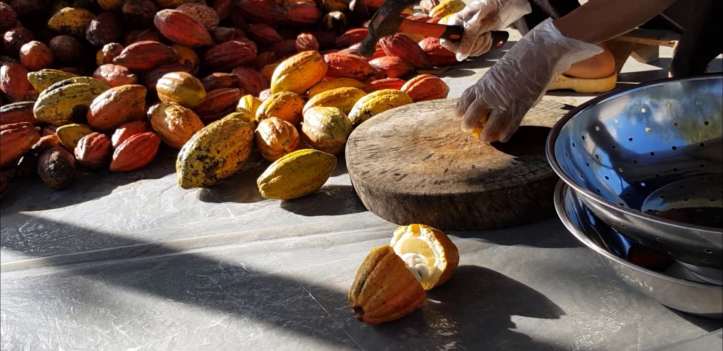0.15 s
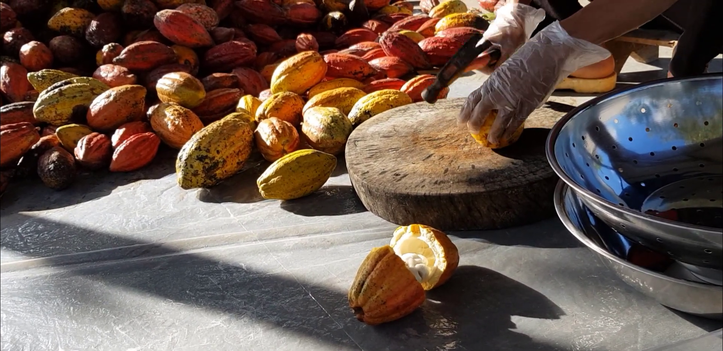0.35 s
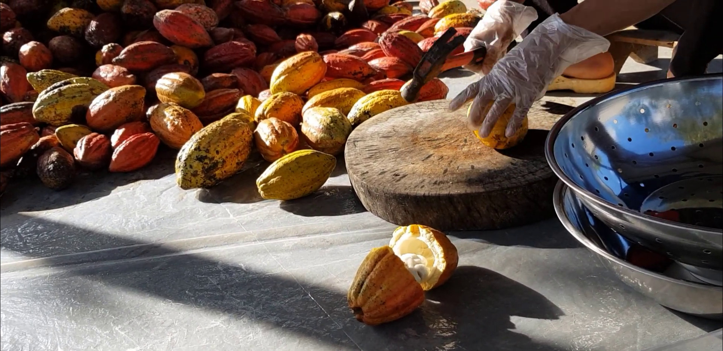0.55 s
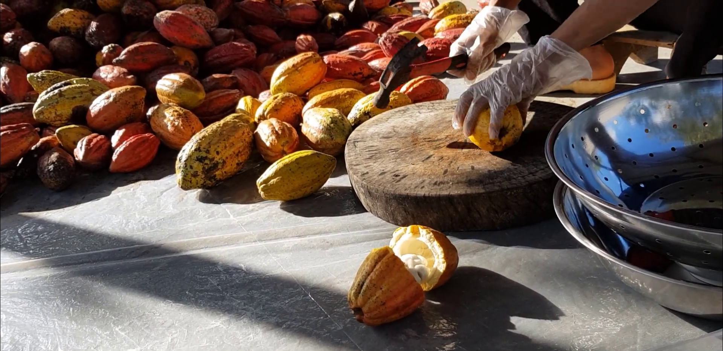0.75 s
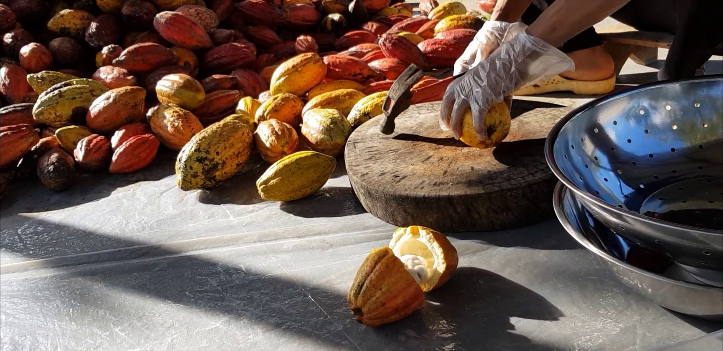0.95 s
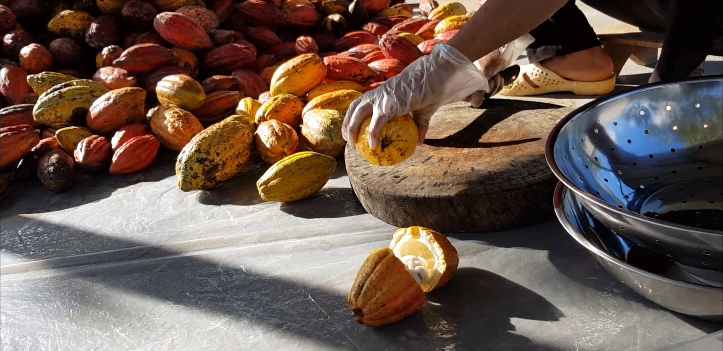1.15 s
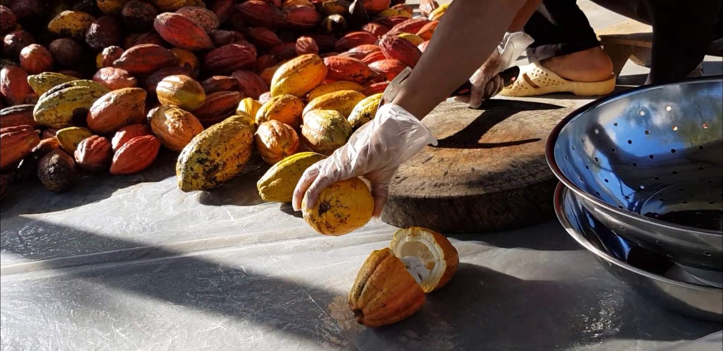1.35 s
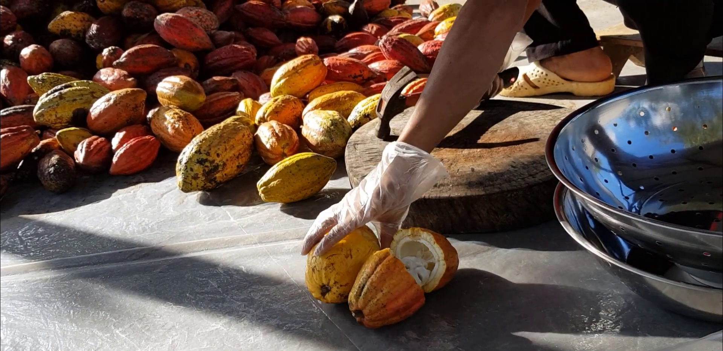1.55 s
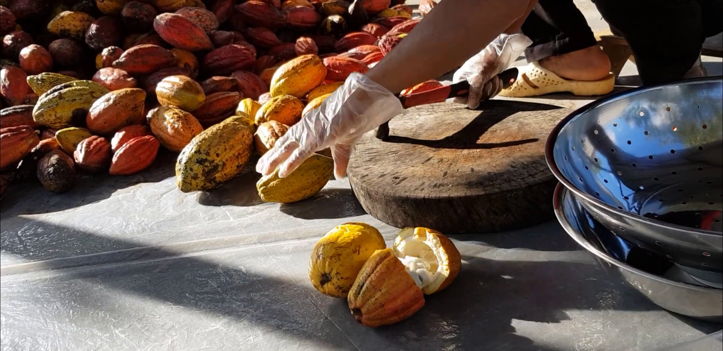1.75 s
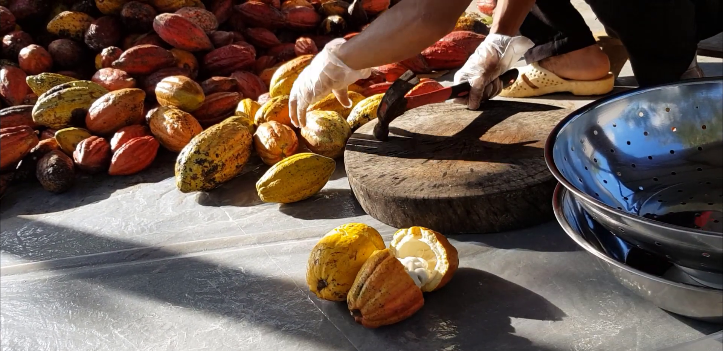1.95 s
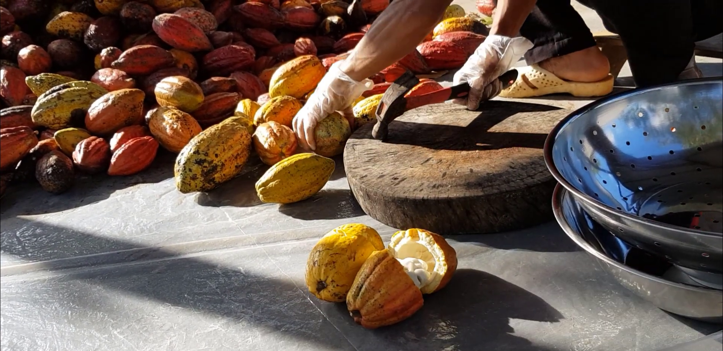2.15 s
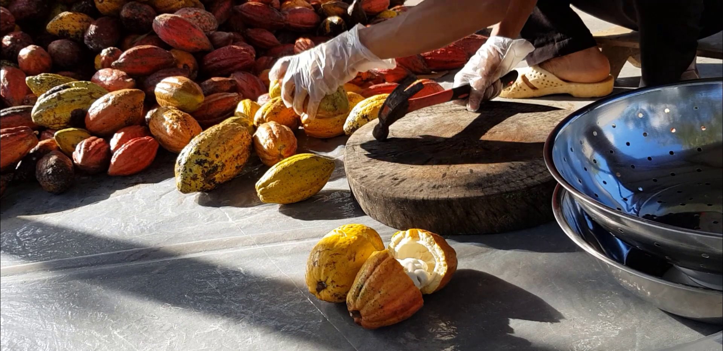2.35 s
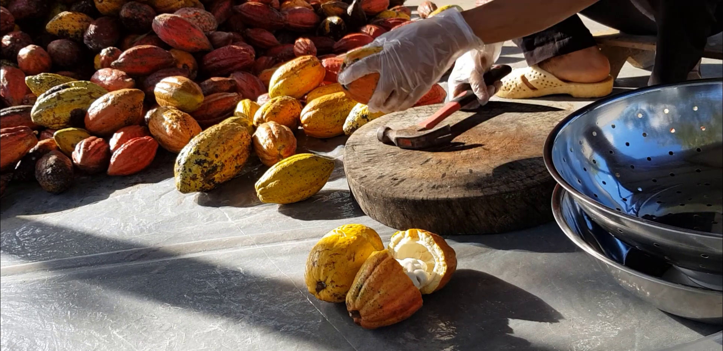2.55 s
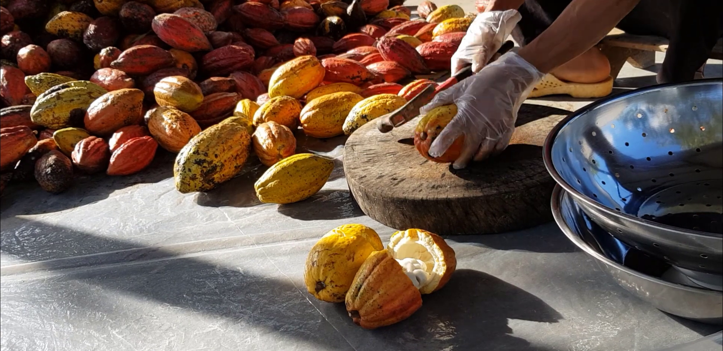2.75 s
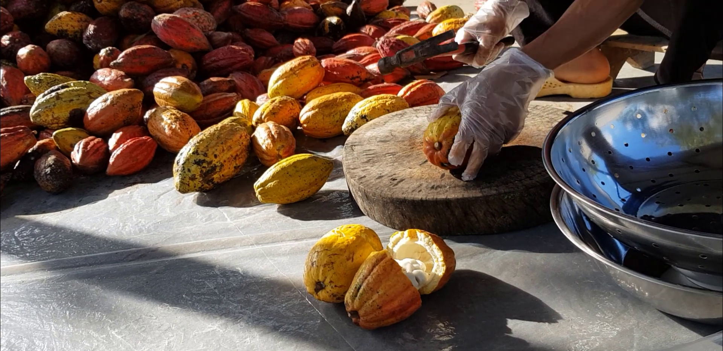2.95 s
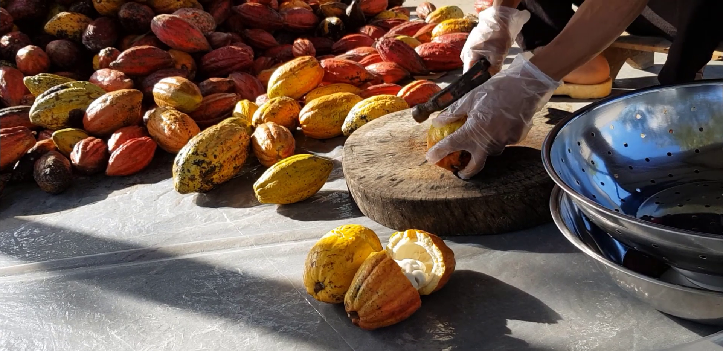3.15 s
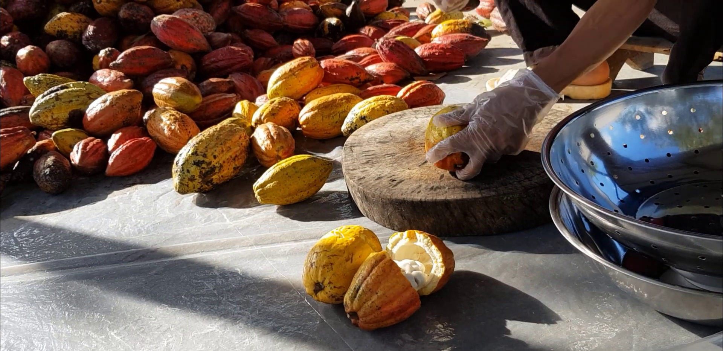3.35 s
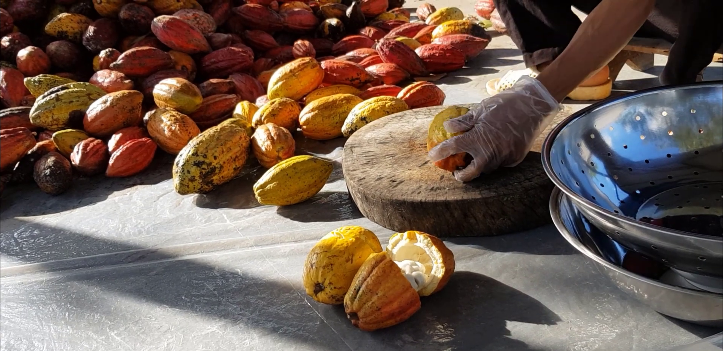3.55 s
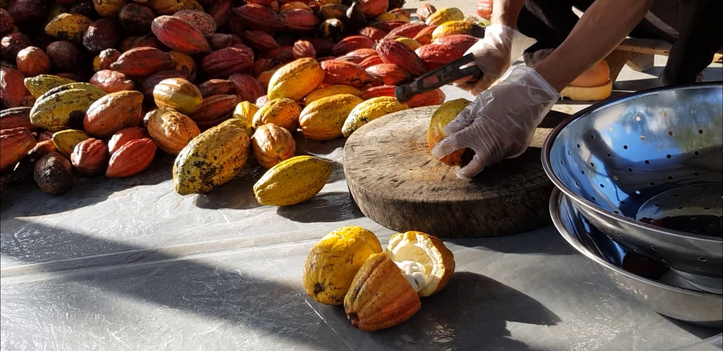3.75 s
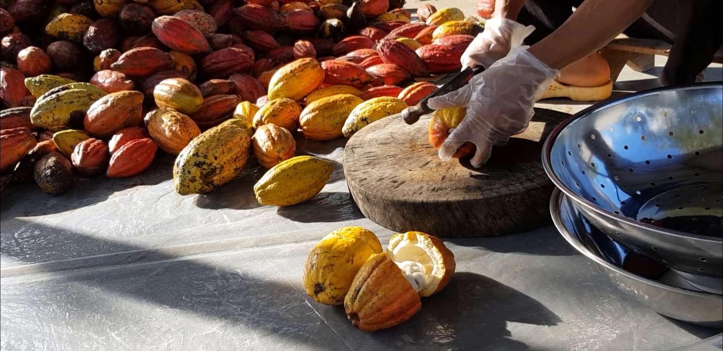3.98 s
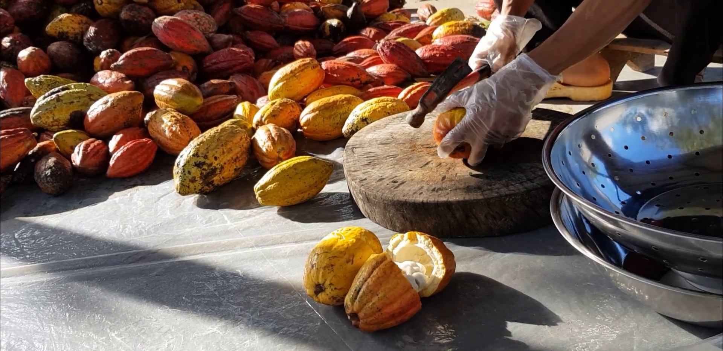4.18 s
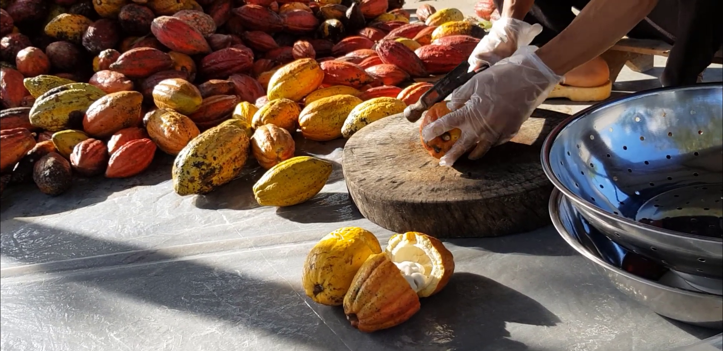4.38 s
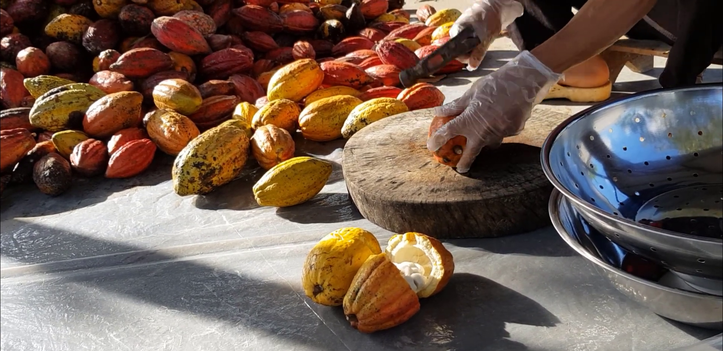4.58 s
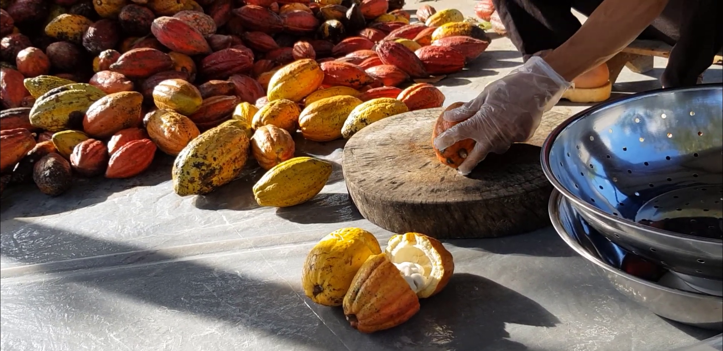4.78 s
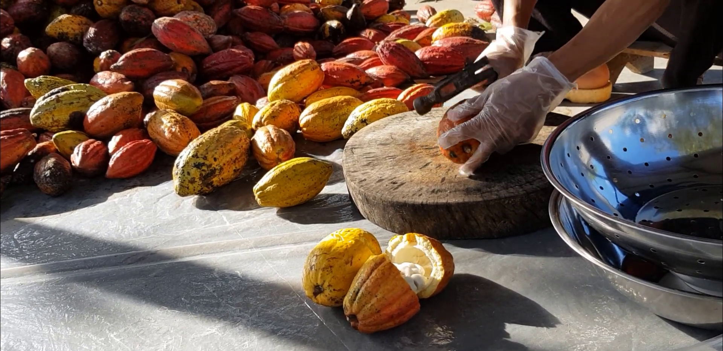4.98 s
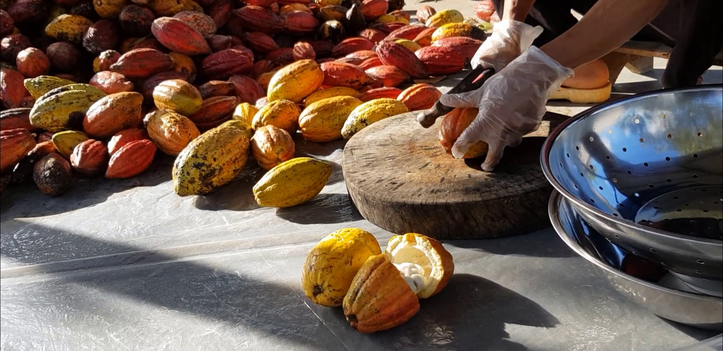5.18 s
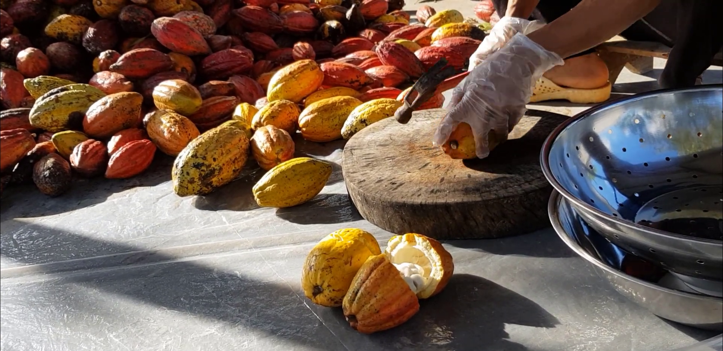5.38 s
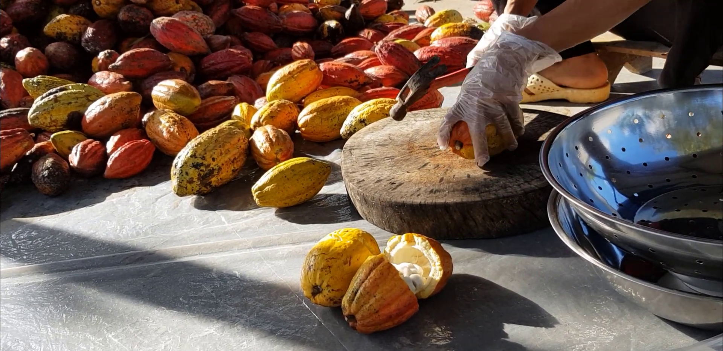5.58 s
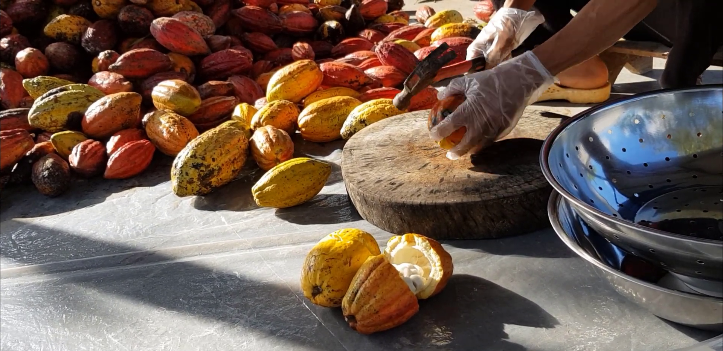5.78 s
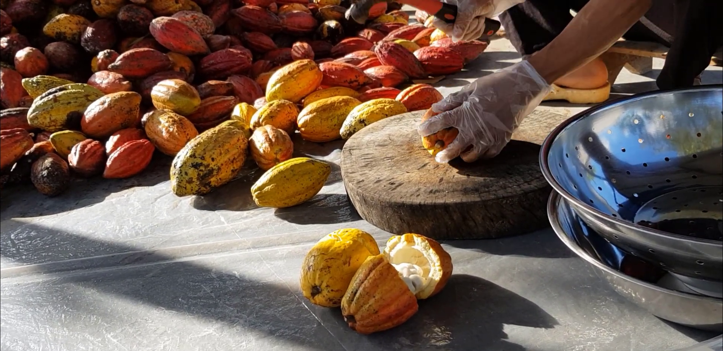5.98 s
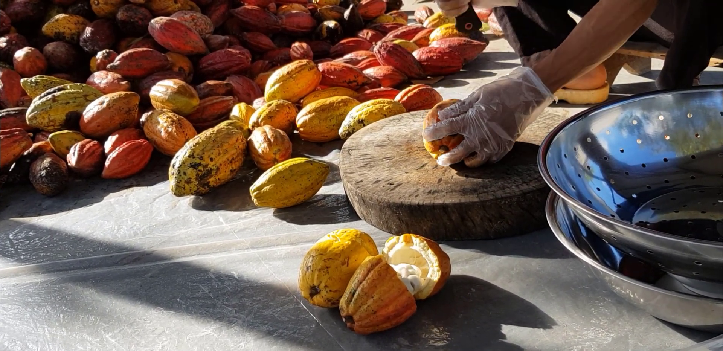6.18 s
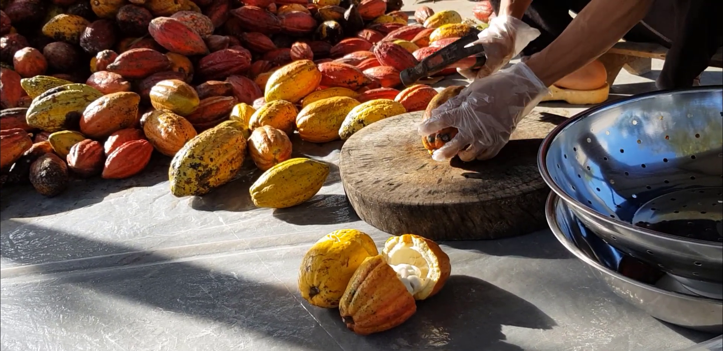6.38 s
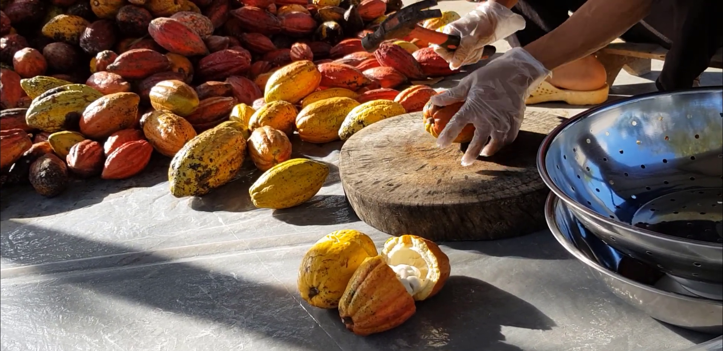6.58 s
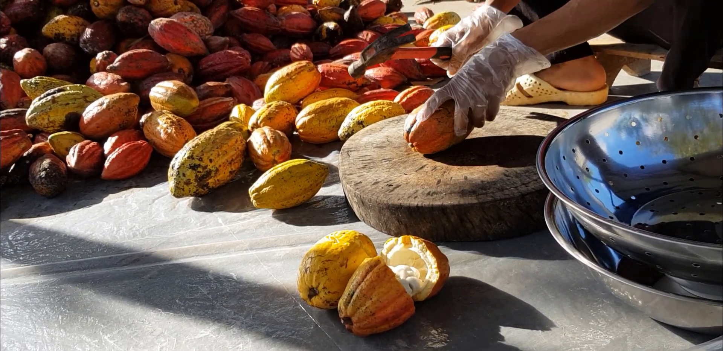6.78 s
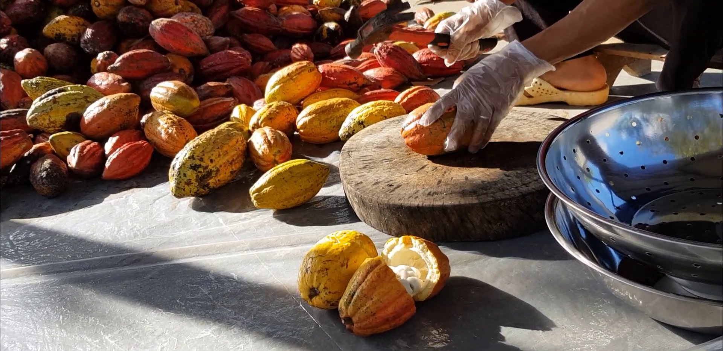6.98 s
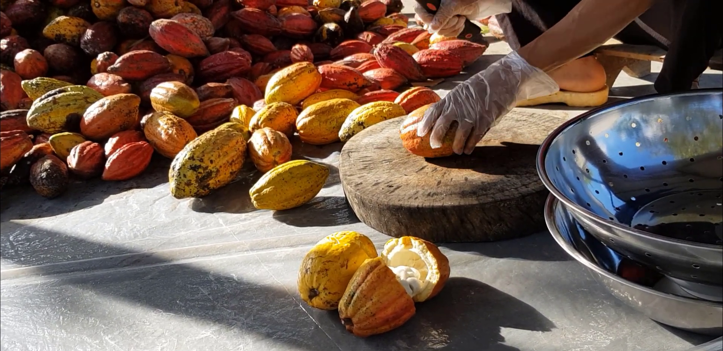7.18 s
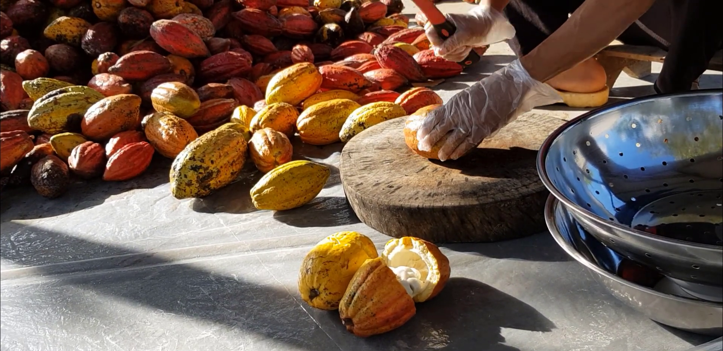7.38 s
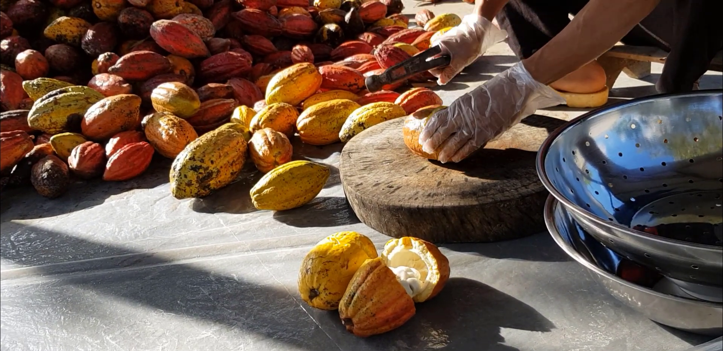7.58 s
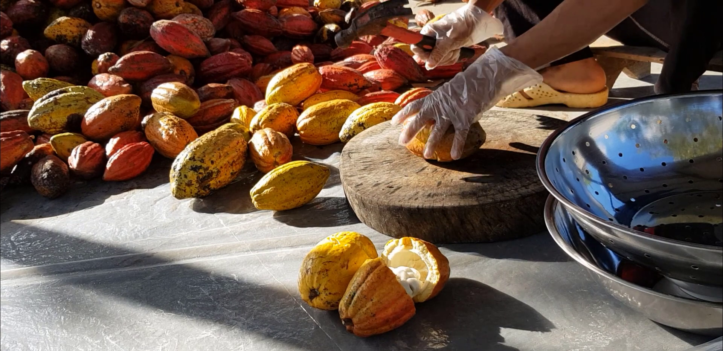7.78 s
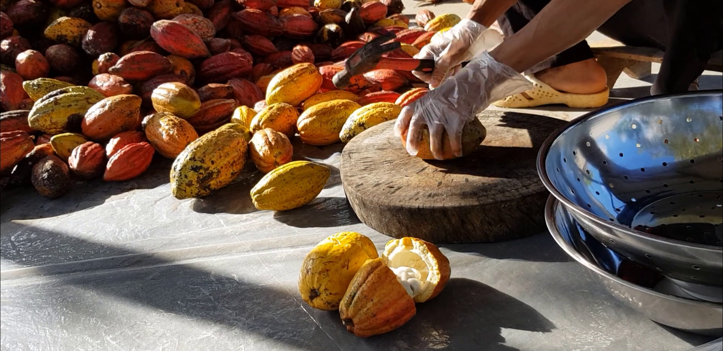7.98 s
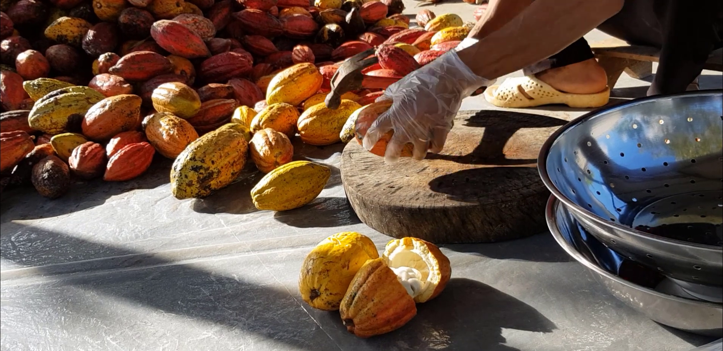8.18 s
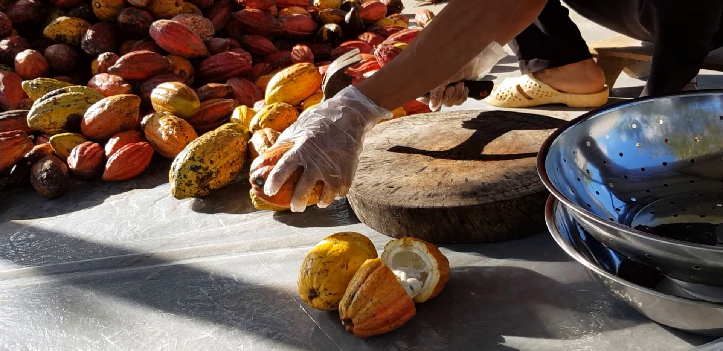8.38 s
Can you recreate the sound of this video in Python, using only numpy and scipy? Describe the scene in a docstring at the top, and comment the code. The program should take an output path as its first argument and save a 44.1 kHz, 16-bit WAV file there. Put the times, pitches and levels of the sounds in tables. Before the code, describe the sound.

Plastic-gloved hands rustle close by while pods are handled and struck on a round wooden block. Soft knocks come first, then a hard metallic-woody clack as the hammer drops on bare wood, followed by sharp hollow cracks with splitting husk and a small ground thump, spaced more than a second apart and getting stronger. Nearby walls reply briefly; the stereo microphone is a step away, over quiet distant rumble.

```python
"""A covered yard, where a steel hammer cracks hard fruit pods on a round wooden block, a step from a stereo microphone.
Each blow knocks the hollow pod (a damped swing), rings the block and steel bowls (decaying modes), splits the
husk (noise clicks) and thumps the ground (a sinking tone); noise echoes give the near walls' brief answer.
The hammer drops once on the bare block. Thin plastic gloves rustle and snap in shaped noise; low sine hums
come and go over a late-swelling noise drone, distant noise rumble and a faint hiss."""
import sys
import numpy as np
from scipy import signal
from scipy.fft import rfft, irfft
from scipy.io import wavfile
from scipy.ndimage import uniform_filter1d

SR = 44100
rng = np.random.default_rng(int(sys.argv[2]) if len(sys.argv) > 2 else 0)


def materialize(psi):
    """Save the field psi as 16-bit PCM at rate SR to the path in sys.argv[1].

    A 1-D psi becomes a single channel; in a 2-D psi each row is a channel.
    """
    bounded = np.clip(np.atleast_2d(psi).T, -1, 1)
    quanta = np.round(bounded * 32767).astype(np.int16)
    wavfile.write(sys.argv[1], SR, quanta)


N = 371763  # length in samples

# pods struck or set down: start_s, level_db, pod_hz, swings (pod cycles until its swing is fullest),
# upper_db (pod's upper tone), contact_ms, block_db, woken_hz (block modes favoured), bowl_db, crack_db,
# late_ms (crack after contact), colour_hz (crack treble corner), tear_db (spatter after the crack),
# thump_db, thump_hz, pan_db (left minus right); part levels are relative to the blow
POD_BLOWS = [(0.4591, -24.5, 534, 1.2, -8, 1.02, -9.5, 945, -30, -20.5, 1, 3400, 1, -8, 147, -2),
             (0.534, -34, 233, 0.5, -20, 1.9, -5, 407, -40, -31, 1.5, 1990, -11, -0.5, 122, -3.5),
             (1.056, -19.5, 424, 1.23, -30, 3.46, -11.5, 440, -50, -49.5, 1.5, 1980, -16, -19.5, 170, -2),
             (1.586, -41, 470, 1.04, -1, 1.1, -3.5, 603, -20, -13.5, 1.5, 2000, 5.5, -7, 183, -2),
             (2.842, -35, 151, 0.99, -20, 3.9, -16, 400, -28.5, -28, 1.5, 2090, -2, -6, 122, -2.5),
             (3.168, -29.5, 281, 1.24, -17, 1.1, -2.5, 425, -23.5, -15, 1.3, 2000, -10, 6.5, 127, -2.5),
             (3.191, -26, 486, 1.2, -12, 1.74, -7.5, 460, -40, -41, 1.5, 2000, -5, -8.5, 155, -2),
             (3.7833, -14.5, 725, 0.83, -0.5, 0.5, -5.5, 495, -5.5, -5, 2.6, 2960, -7.5, -1, 139, -2.5),
             (3.7944, -14.5, 458, 0.98, -11.5, 0.3, -3, 792, -33.5, -27, 1.8, 1290, 17, -8, 140.2, -1),
             (5.0366, -13, 710, 0.91, -12, 0.64, -2, 886, -12, -6.5, 3.4, 5900, -8, -2.5, 137, -2),
             (5.909, -45.5, 338, 1.3, -10, 1.3, -4, 400, -22, -18.5, 1.5, 3030, 9, -10.5, 195, 0),
             (6.379, -7.5, 591, 0.85, -13, 0.52, -9, 730, -22, -17, 1.6, 4500, -4.5, -7, 149, -1),
             (6.478, -45, 210, 1.24, -6, 1.14, 4.5, 500, -25.5, -24, 1.5, 2210, 11, -1, 135, 0),
             (7.527, -2, 620, 0.91, -1, 1.3, -12, 436, -33, -23.5, 3.1, 1580, -1.5, -16, 133, -1)]
# left-right likeness of spread-out sounds: pitch_hz, likeness (0-1)
FAR_LIKENESS = [(60, 1), (300, 0.85), (700, 0.4), (1500, 0), (6000, 0.31), (16000, 0)]
# left-right likeness of sounds close by: pitch_hz, likeness (0-1)
NEAR_LIKENESS = [(60, 0.92), (300, 1), (700, 0.5), (1100, .1), (1800, 0.39), (6000, 0.29), (16000, 0.091)]


def undb(db):
    """Decibels to an amplitude factor."""
    return 10 ** (np.asarray(db, float) / 20)


def unit(x):
    """Scales a sound to an RMS of one."""
    return x / np.sqrt(np.mean(x ** 2))


def curve(table):
    """Level of a (s, dB) table, sample by sample."""
    s, db = np.transpose(table)
    return np.interp(np.arange(N) / SR, s, db)


def at(table, hz):
    """Value of an (Hz, value) table on a log pitch axis."""
    f, v = np.transpose(table)
    return np.interp(np.log(np.maximum(hz, 1)), np.log(f), v, left=v[0], right=v[-1])


def fade(t, t60):
    """Exponential decay that falls 60 dB in t60 seconds."""
    return np.exp(-np.log(1000) * t / t60)


def walk(rate):
    """Random levels held 1 / rate s and slewed twice."""
    hold = int(SR / rate)
    steps = np.repeat(rng.standard_normal(N // hold + 1), hold)
    return uniform_filter1d(uniform_filter1d(steps, hold), hold)[:N]


def stereo(raw, gain, likeness):
    """Colours two noises and blends them into a pair as alike at each pitch as the table says."""
    size = raw.shape[1]
    hz = np.arange(size // 2 + 1) * SR / size
    alike = np.clip(at(likeness, hz), -.99, .999)
    mid, side = rfft(raw) * gain(hz) * np.sqrt([1 + alike, 1 - alike])
    return irfft(np.array([mid + side, mid - side]) / 2, size)


def ring(modes, t, spread_db):
    """Decaying modes whose pitches and levels vary at random from one ring to the next."""
    hz, db, t60 = np.transpose(modes)[:, :, None]
    pitch_chance, level_chance = rng.standard_normal((2, len(modes), 1))
    hz = hz * (1 + 0.0043 * pitch_chance)
    tones = fade(t, t60) * np.sin(2 * np.pi * hz * t)
    return np.sum(undb(db + spread_db * level_chance) * tones, 0)


def swing(hz, rise_s, t):
    """A heavily damped swing that builds for rise_s and dies."""
    return np.sin(2 * np.pi * hz * t) * (t / rise_s) ** 2 * np.exp(2 - 2 * t / rise_s)


def pushed(x, contact_ms):
    """A softer contact is a longer push and leaves out the treble."""
    keep = np.exp(-6000 / (max(contact_ms, .05) * SR))
    return signal.lfilter([(1 - keep) ** 2], [1, -2 * keep, keep ** 2], x)


def blows(yard):
    """Each blow sums the pod's knock, the block, the bowls, the husk's crack and the late ground thump."""
    out, t = np.zeros((2, N)), np.arange(SR // 2) / SR
    for (s, db, pod_hz, swings, upper_db, contact_ms, block_db, woken_hz, bowl_db, crack_db,
         late_ms, colour_hz, tear_db, thump_db, thump_hz, pan_db) in POD_BLOWS:
        wood = undb(block_db) * block(woken_hz, t)
        knock = pushed(pod(pod_hz, swings, upper_db, t) - wood, contact_ms)
        crack = undb(crack_db) * husk(colour_hz, tear_db, late_ms / 1000, t)
        wide = crack + undb(bowl_db) * bowls(t)
        centre = knock - undb(thump_db) * thump(thump_hz, t)
        add(out, s, undb(db) * centre, undb(db) * wide, pan_db, yard)
    return out


def pod(hz, swings, upper_db, t):
    """The hollow pod pulls the air in first, then swings at its pitch and a higher tone."""
    upper = swing(1.717 * hz, swings / hz, t)
    return -swing(hz, swings / hz, t) - undb(upper_db) * upper


def block(woken_hz, t):
    """Wood modes rung by one push, then by the small pushes of the pod chattering on the block."""
    # modes of the wooden block: pitch_hz, level_db (before favouring), t60_s
    block_modes = [(132.7, -10, 0.071), (168.6, -7.5, 0.085), (248.5, -8, 0.12), (321, -13.5, 0.075),
                   (372.4, -2, 0.098), (441.2, -1.5, 0.08), (571, -3.5, 0.085), (634, -0.5, 0.046),
                   (745, -1, 0.041), (801, -0.5, 0.077), (881, -2.5, 0.069), (913, 0, 0.066),
                   (1001, 1.5, 0.05), (1226, -8, 0.072), (1485, -5, 0.076), (1706, -21.5, .04),
                   (2010, -6, 0.038), (2950, -13, 0.052)]
    woken_db, woken_octaves = 9, 0.23
    chatter_db, chatter_t60_s = -8.5, 0.026
    # where the pod lies decides which modes wake most
    modes = []
    for hz, db, t60 in block_modes:
        favour = np.exp(-(np.log2(hz / woken_hz) / woken_octaves) ** 2)
        modes.append((hz, db + woken_db * favour, t60))
    chatter = rng.standard_normal(len(t)) * fade(t, chatter_t60_s) * np.minimum(t / 0.0021, 1)
    chatter = undb(chatter_db) * chatter / np.sqrt(np.sum(chatter ** 2))
    pushes = chatter + (t == 0)
    wood = signal.fftconvolve(ring(modes, t, spread_db=3.5), pushes)[:len(t)]
    wood = wood * (1 - np.exp(-(t / 0.0034) ** 2))
    return wood / np.sqrt(np.sum(wood ** 2) / (0.011 * SR))


def bowls(t):
    """Steel bowls beside the block ring up slowly and flutter in level."""
    # bowl modes: pitch_hz, level_db, t60_s (before the extra fade below)
    bowl_modes = [(874, -31, 1.2), (1227, -44, .5), (434, -39, .3)]
    swell = (1 - np.exp(-t / .05)) * fade(t, 3.1)
    return ring(bowl_modes, t, spread_db=8) * swell * undb(walk(31.4)[:len(t)])


def husk(colour_hz, tear_db, late_s, t):
    """A burst of uneven clicks a moment after contact, with a fading, crunchy spatter."""
    snap_t60_s, spatter_t60_s, tear_t60_s = 0.0064, 0.031, 0.22

    def colour(f):
        bass_cut = (f / 900) ** 2 / (1 + (f / 900) ** 2)
        return bass_cut / (1 + (f / colour_hz) ** 2) ** 0.67

    uneven = undb(2.0 * np.minimum(rng.exponential(size=len(t)), 4))
    clicks = unit(stereo(rng.standard_normal((2, len(t))) * uneven, colour, NEAR_LIKENESS))
    late = np.maximum(t - late_s, 0)
    snap = (1 - np.exp(-(late / 0.00057) ** 2)) * fade(late, snap_t60_s)
    crunch = undb(3.5 * walk(300)[:len(t)])
    tear = undb(tear_db) * crunch * fade(t, tear_t60_s)
    start = 1 - np.exp(-(t / 0.0028) ** 2)
    return clicks * (snap + start * (fade(t, spatter_t60_s) + tear))


def thump(hz, t):
    """The ground answers late with a damped tone that starts higher and sinks to its pitch."""
    late_s, rise_s = .0035, 0.0045
    from_ratio, sink_s = 1.56, 0.0043
    t = np.maximum(t - late_s, 0)
    turns = hz * (t + (from_ratio - 1) * sink_s * (1 - np.exp(-t / sink_s)))
    return np.sin(2 * np.pi * turns) * (t / rise_s) ** 2 * np.exp(2 - 2 * t / rise_s)


def hammer_drops(yard):
    """The dropped hammer rings its modes, rocks on the wood and lightly thumps the ground."""
    # drops on the bare block: start_s, level_db, pan_db (left minus right), contact_ms
    drop_table = [(2.632, -11.5, -1, 0.29)]
    # hammer-on-block modes: pitch_hz, level_db, t60_s
    hammer_modes = [(562, 7.5, 0.016), (470, -8, .06), (539, -9, 0.056), (690.5, -9.5, 0.05),
                    (806, -9, 0.13), (1370, -11.5, 0.07), (1404, -3.5, 0.096), (1496, -4.5, 0.1),
                    (1536, 1.5, 0.035), (1224, -11, 0.023), (1583, -0.5, 0.032), (2050, -12, 0.039),
                    (2250, -16.5, 0.033), (2437, -13, 0.088), (2890, -14, .02), (3205, -7.5, 0.015)]
    out, t = np.zeros((2, N)), np.arange(SR // 2) / SR
    for s, db, pan_db, contact_ms in drop_table:
        hammer = ring(hammer_modes, t, spread_db=4) * (1 - np.exp(-(t / 0.0015) ** 2))
        rocking_db = 7.5 * walk(150)[:len(t)] * np.minimum(t / 0.013, 1)
        hammer = hammer * undb(rocking_db)
        thud = undb(-17.5) * thump(120, t)
        add(out, s, undb(db) * (thud - pushed(hammer, contact_ms)), 0, pan_db, yard)
    return out


def add(out, s, x, wide, pan_db, yard):
    """Places a sound, its echoes and its wide part, which has no echoes."""
    # small things radiate no deep bass
    x = signal.sosfilt(signal.butter(1, 70, "high", fs=SR, output="sos"), x)
    pair = (x + wide) * undb([[pan_db / 2], [-pan_db / 2]])
    pair = pair + signal.fftconvolve(x[None], yard, axes=1)[:, :len(x)]
    i = int(s * SR)
    out[:, i:i + len(x)] += pair[:, :N - i]


def echoes(t):
    """Dense noise echoes: a short answer of ground and near things plus walls that die at a rate per band."""
    # decay of the walls: pitch_hz, t60_s
    wall_decay = [(60, 1), (160, 0.38), (420, 0.2), (900, 0.28), (1450, 0.2), (3000, 0.3), (8000, 0.073),
                  (16000, 0.17)]
    # level of the echoes: pitch_hz, level_db
    wall_level = [(60, -2.5), (200, -7.5), (450, -5), (900, -8), (1600, -1), (4000, -2), (16000, -3)]
    early_db, early_t60_s = -2, 0.016
    raw, out = rng.standard_normal((2, len(t))), 0
    rise = np.clip(t / 0.0022 - .3, 0, 1)
    for hz in 62.5 * 2. ** np.arange(0, 8.5, .5):  # overlapping bands, half an octave apart
        def bell(f):
            return np.cos(np.pi * np.clip(np.log2(f / hz + 1e-9), -.5, .5)) ** 2

        decay = fade(t, at(wall_decay, hz)) + undb(early_db) * fade(t, early_t60_s)
        band = stereo(raw, bell, NEAR_LIKENESS) * rise * decay
        out = out + undb(at(wall_level, hz)) * band * np.sqrt(hz / SR / np.sum(band ** 2))
    return out


def gloves():
    """Crinkling plastic film: dense tiny snaps that swell with each movement, hold, die away and flicker."""
    # movements of a gloved hand: start_s, length_s, rustle_db, low_db (its lower part, relative)
    glove_moves = [(0, 0.014, -49, -1.5), (0.122, 0.076, -55.5, -11), (0.3, 0.021, -66, -11.5),
                   (0.474, 0.41, -58.5, -16), (0.671, 0.22, -52.5, -2.5), (1.082, 0.047, -55.5, -1.5),
                   (1.19, 0.011, -50.5, -6), (1.255, 0.19, -53, -2.5), (1.519, 0.077, -48.5, -4.5),
                   (1.613, 0.3, -52, -6.5), (1.982, 0.14, -56, -14), (2.069, 0.08, -41, 0.5),
                   (2.207, 0.039, -48, 2.5), (2.348, 0.39, -52.5, -4.5), (2.465, 0.18, -46.5, -3),
                   (2.789, 0.065, -45, -2), (2.894, 0.073, -46, -4), (3.022, 0.055, -45.5, -4.5),
                   (3.106, 0.16, -50, -4.5), (3.374, 0.1, -54, -5.5), (3.462, 0.16, -53.5, -8),
                   (3.663, 0.17, -51.5, -5.5), (3.893, 0.16, -56.5, 3.5), (4.103, 0.088, -53.5, -0.5),
                   (4.24, 0.16, -52.5, -3), (4.483, 0.11, -55, -7), (5.112, 0.17, -55, 3.5),
                   (5.395, 0.25, -56.5, -3), (5.627, 0.038, -48.5, -5), (5.796, 0.2, -51.5, -5.5),
                   (5.992, 0.22, -64, -17.5), (6.43, 0.28, -57, 2), (6.736, 0.13, -50.5, -5.5),
                   (6.965, 0.12, -51, -12), (7.114, 0.091, -48, -5), (7.258, 0.037, -46.5, -2),
                   (7.35, 0.15, -58, -7), (7.665, 0.39, -52.5, -3), (8.31, 0.073, -58.5, 1)]
    # colour of the rustle: pitch_hz, level_db (per Hz)
    rustle_colour = [(210, -26), (350, -8), (560, -9.5), (900, -2), (1200, -11.5), (1600, -7.5), (2200, -8),
                     (4260, -4.5), (6240, -5.5), (7550, -3.5), (9430, -9.5), (13400, -5), (15300, -9.5),
                     (16500, -13.5)]
    attack_s, t60_s, idle_db = 0.074, 0.36, -64.5
    s, length, db, low_db = np.transpose(glove_moves)[:, :, None]
    clock = np.arange(0, N + 64, 64) / SR  # one level every 64 samples
    t = clock - s
    attack = np.clip(t / attack_s + .5, 0, 1)  # half open at the start time
    move = undb(db) * attack * fade(np.maximum(t - length, 0), t60_s)

    def together(gains):
        power = np.sum(gains ** 2, 0) + undb(idle_db) ** 2
        return np.interp(np.arange(N) / SR, clock, np.sqrt(power))

    def low(f):
        return 1 / (1 + (f / 2500) ** 4)

    snaps = rng.standard_normal((2, N)) * undb(1.2 * rng.exponential(size=N))
    high = stereo(snaps, lambda f: undb(at(rustle_colour, f)) * (1 - low(f)), FAR_LIKENESS)
    under = stereo(snaps, lambda f: undb(at(rustle_colour, f)) * low(f), FAR_LIKENESS)
    pair = together(move) * high + together(move * undb(low_db)) * under
    pair = pair / np.sqrt(np.mean(high ** 2))
    flicker_db = 1.5 * walk(40) + 2.0 * walk(300) + 1.9 * walk(15)
    return undb(flicker_db + np.array([[-.9], [.9]])) * pair  # a little to the right


def ticks():
    """Single dry snaps of a glove: millisecond noise bursts in a broad band."""
    # snaps: start_s, peak_db, centre_hz, width_hz
    tick_table = [(.8125, -30, 12200, 6100), (1.043, -46, 6000, 5000), (1.594, -41, 7000, 8000),
                  (1.79, -44, 8000, 8000), (2.372, -38, 6020, 9000), (6.337, -40.5, 9100, 9000),
                  (6.607, -33.5, 2940, 3530), (6.891, -35, 1500, 3600), (7.962, -30, 8000, 6040)]
    out, t = np.zeros((2, N)), np.arange(SR // 20) / SR
    for s, db, hz, width_hz in tick_table:
        raw = rng.standard_normal((2, len(t)))
        band = stereo(raw, lambda f: np.exp(-((f - hz) / width_hz) ** 2 * 2), NEAR_LIKENESS)
        burst = band * t * np.exp(-t / 0.00033)
        i = int(s * SR)
        out[:, i:i + len(t)] += undb(db) * burst / np.max(np.abs(burst))
    return out


def hum():
    """Low sine tones that come in spells, each drifting in level and wavering."""
    # spells of a deep hum and a fainter higher one: start_s, length_s, pitch_hz, start_db, end_db
    hum_spells = [(0.82, 0.72, 61.3, -47.5, -44), (3.016, 0.95, 62.4, -47, -41),
                  (3.92, 0.59, 61.3, -51, -44.5), (4.546, 0.12, 61.8, -49.5, -51.5),
                  (4.745, 0.056, 61.3, -44.5, -50.5), (1.951, 0.82, 214.8, -69, -63.5),
                  (3.014, 0.41, 213.8, -68, -63), (4.079, 0.51, 209.6, -64, -73)]
    edge_s = 0.045
    t, out = np.arange(N) / SR, 0
    for s, length, hz, db, end_db in hum_spells:
        on = np.clip(np.minimum(t - s, s + length - t) / edge_s + .5, 0, 1)
        level = undb(np.interp(t, [s, s + length], [db, end_db]))
        out = out + on * level * np.sin(2 * np.pi * hz * t)
    return np.sqrt(2) * undb(1.5 * walk(13.0)) * out  # table levels are RMS


def drone():
    """A fluttering band of low noise that swells late and eases at the very end."""
    # level of the drone: time_s, level_db
    drone_level = [(5.3, -69), (7.5, -62), (8.2, -53), (8.43, -62)]
    centre_hz, width_hz = 332, 57
    raw = rng.standard_normal((2, N))
    band = stereo(raw, lambda f: 1 / (1 + ((f - centre_hz) / width_hz) ** 2), FAR_LIKENESS)
    return unit(band) * undb(curve(drone_level) + 1.4 * walk(14))


def rumble():
    """Distant noise: a steady deep part that booms in the yard after each blow, and an upper part on its own."""
    # colour of the rumble: pitch_hz, level_db (per Hz)
    distant_colour = [(13, -58.5), (22, -30), (47, -6), (71, 1), (147, -11.5), (215, -14.5), (237, -20),
                      (374, -32.5), (404, -36.5), (438, -34.5), (464, -31), (503, -33), (2500, -45),
                      (3250, -83), (5500, -120)]
    # gain of the upper rumble: time_s, gain_db
    upper_gain = [(0, -56.5), (1.5, -56), (2.1, -49), (3.3, -48), (4.2, -50), (4.7, -55.5), (5.4, -48.5),
                  (6.2, -54.5), (7.2, -43), (8.43, -42.5)]
    steady_db = -54.5
    boom_db, boom_t60_s, boom_rise_s = -28.5, 2.9, 0.033  # level relative to each thump
    s, db, *_, thump_db, _, _ = np.transpose(POD_BLOWS)[:, :, None]
    t = np.maximum(np.arange(N) / SR - s, 0)
    boom = undb(db + thump_db + boom_db) * np.minimum(t / boom_rise_s, 1) * fade(t, boom_t60_s)

    def low(f):
        return 1 / (1 + (f / 220) ** 4)

    def upper_colour(f):
        return undb(at(distant_colour, f)) * (1 - low(f)) / (1 + (f / 2500) ** 4)

    raw = rng.standard_normal((2, N))
    deep = stereo(raw, lambda f: undb(at(distant_colour, f)) * low(f) * (f > 18), FAR_LIKENESS)
    upper = stereo(raw, upper_colour, FAR_LIKENESS)
    deep_gain = np.sqrt(undb(steady_db) ** 2 + np.sum(boom ** 2, 0))
    both = deep_gain * deep + undb(curve(upper_gain)) * upper
    return undb(2.0 * walk(8.0)) * both / np.sqrt(np.mean(deep ** 2))


def distance():
    """Rumble and hum together, leaning slightly to the right."""
    return (rumble() + hum()) * undb([[-.7], [.7]])


def hiss():
    """A steady coloured noise under everything."""
    # colour of the hiss: pitch_hz, level_db (per Hz)
    hiss_colour = [(530, -32), (900, -2.5), (1760, -11), (2400, -18.5), (2800, -5.5), (6480, -5), (7570, 3),
                   (9730, -7), (13300, 1.5), (14600, -6), (15700, -20.5)]
    noise = stereo(rng.standard_normal((2, N)), lambda f: undb(at(hiss_colour, f)), FAR_LIKENESS)
    return undb(-62.5) * unit(noise)


def scene():
    """The work in its yard, the gloves and the background."""
    yard = echoes(np.arange(SR // 2) / SR)
    work = blows(yard) + hammer_drops(yard)
    return work + gloves() + ticks() + drone() + distance() + hiss()


def record(dry):
    """The left port is further from the work; the deepest bass is lost and the top cut steeply."""
    left_lag_s, low_cut_hz, top_hz = .00009, 15, 15700
    lag = int(round(left_lag_s * SR))
    ports = np.array([np.r_[np.zeros(lag), dry[0, :N - lag]], dry[1]])
    thin = signal.sosfilt(signal.butter(2, low_cut_hz, "high", fs=SR, output="sos"), ports)
    return signal.sosfilt(signal.ellip(8, .2, 70, top_hz, fs=SR, output="sos"), thin)


dry = scene()
out = record(dry)
materialize(out)
```